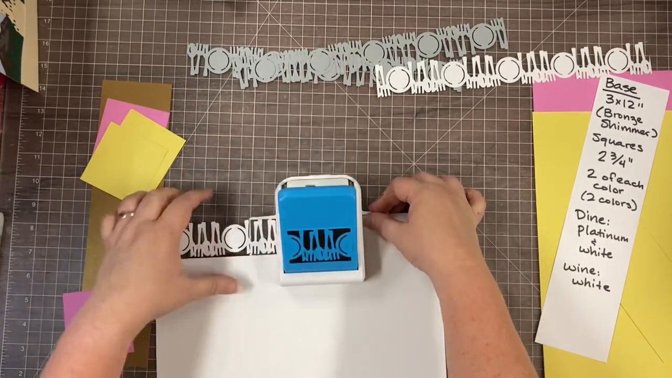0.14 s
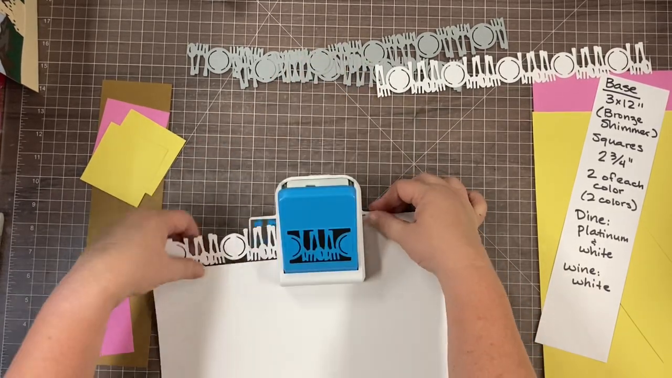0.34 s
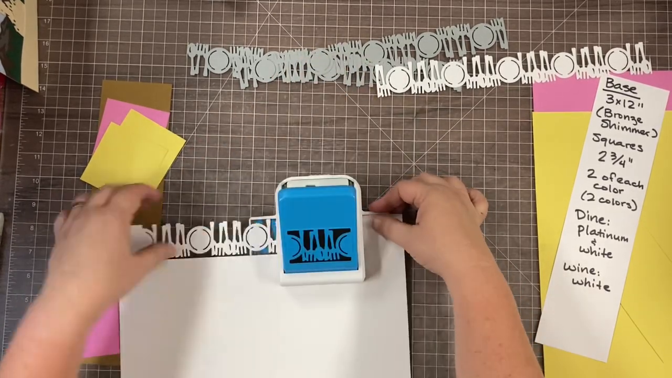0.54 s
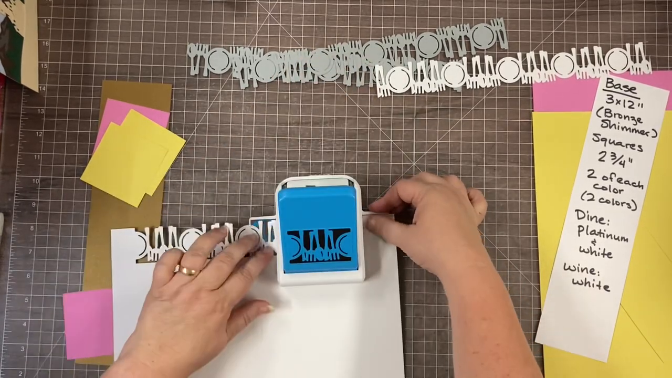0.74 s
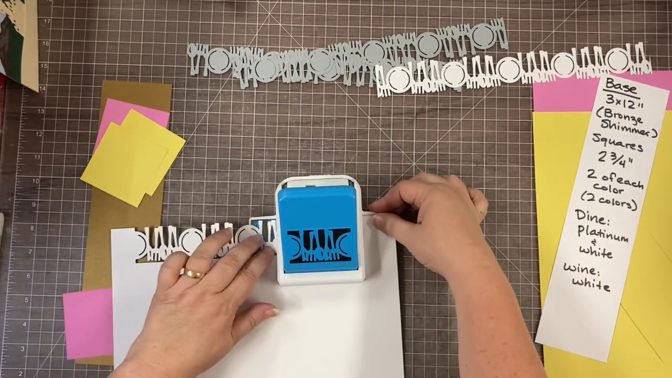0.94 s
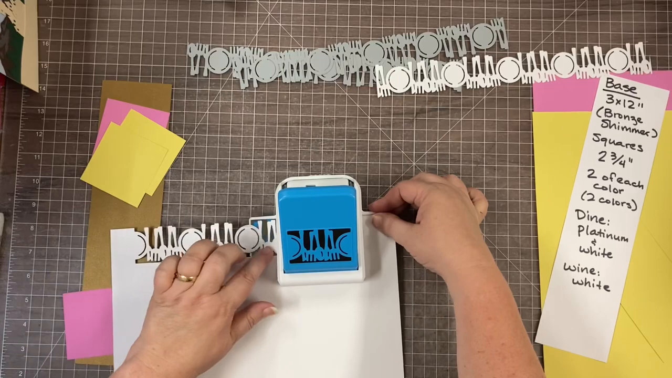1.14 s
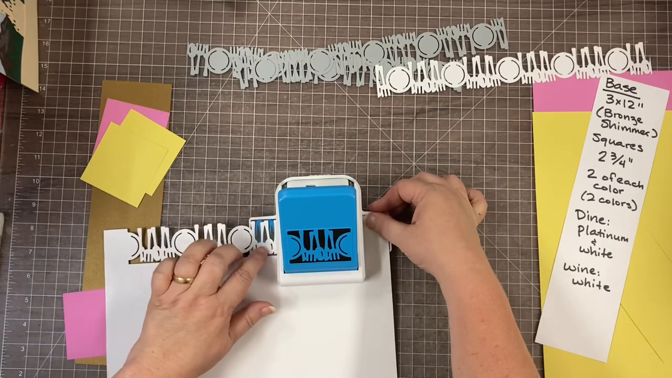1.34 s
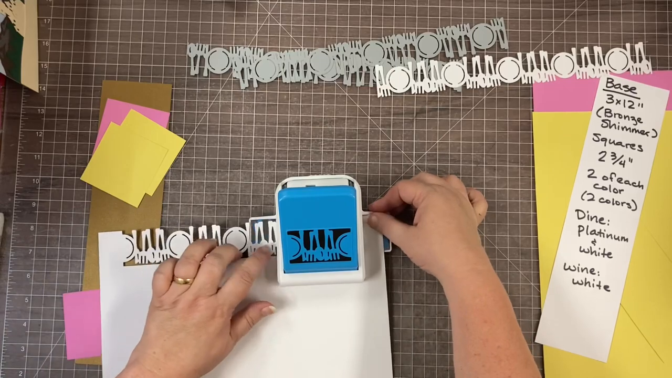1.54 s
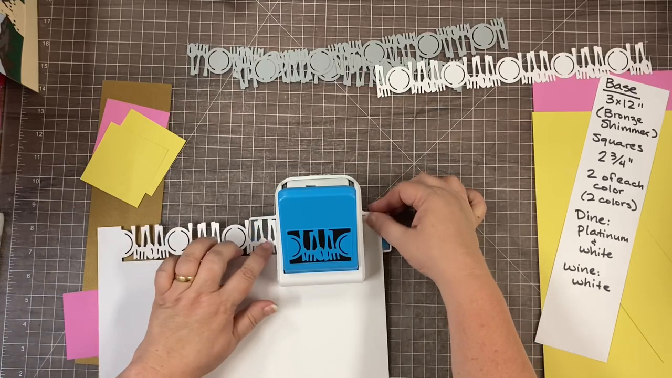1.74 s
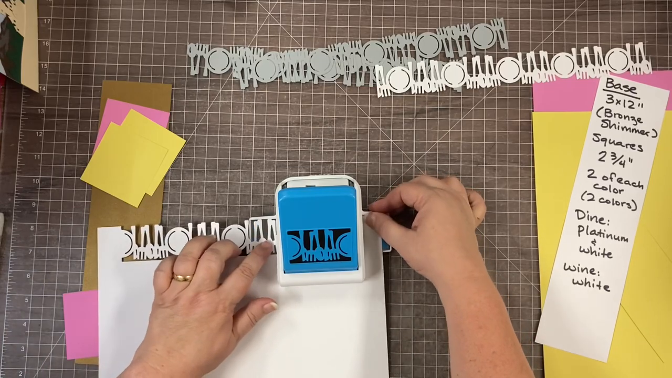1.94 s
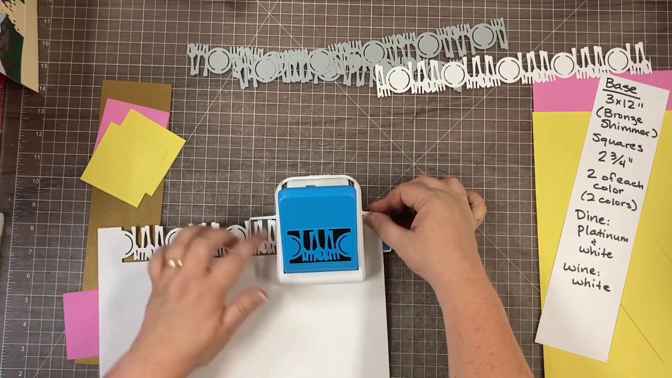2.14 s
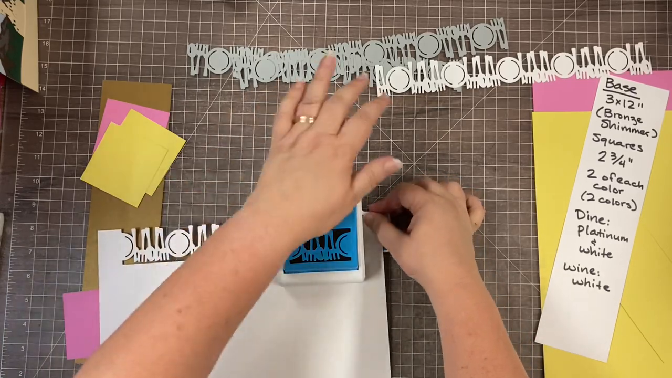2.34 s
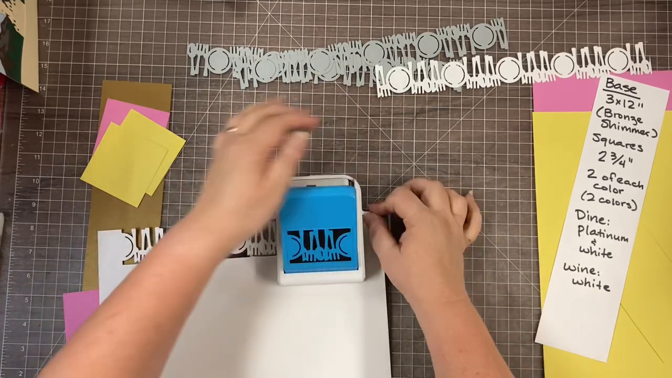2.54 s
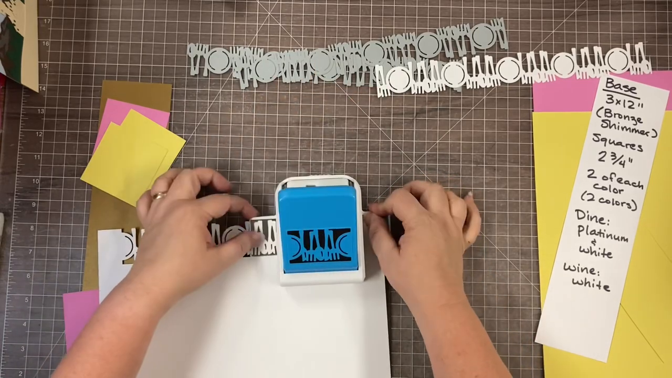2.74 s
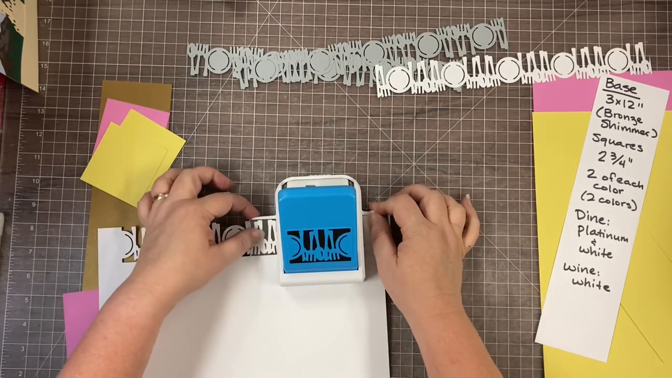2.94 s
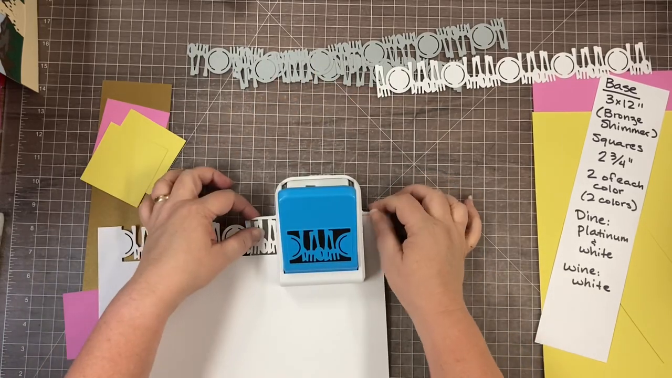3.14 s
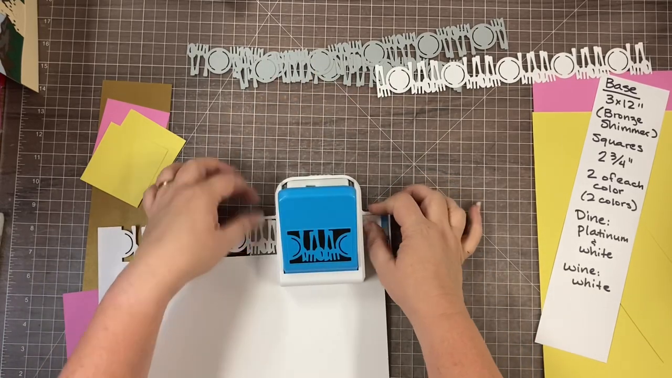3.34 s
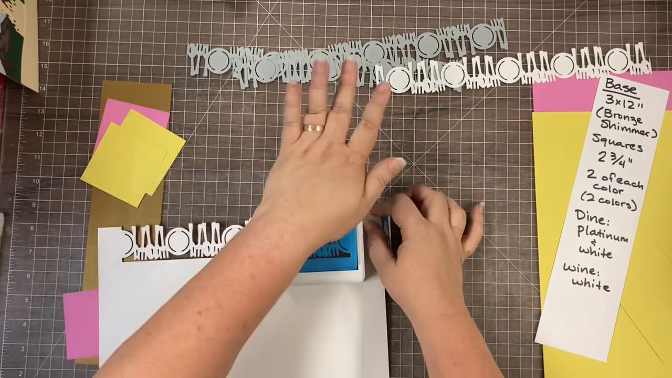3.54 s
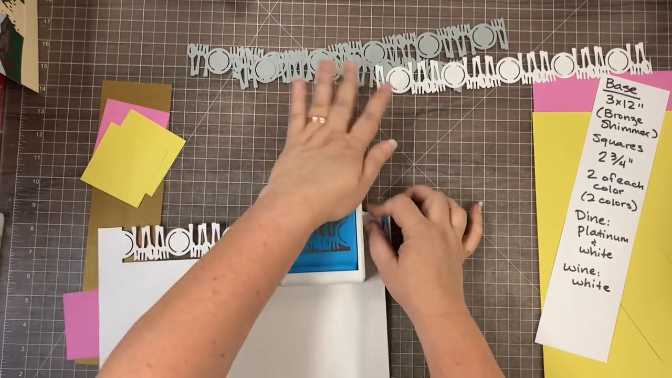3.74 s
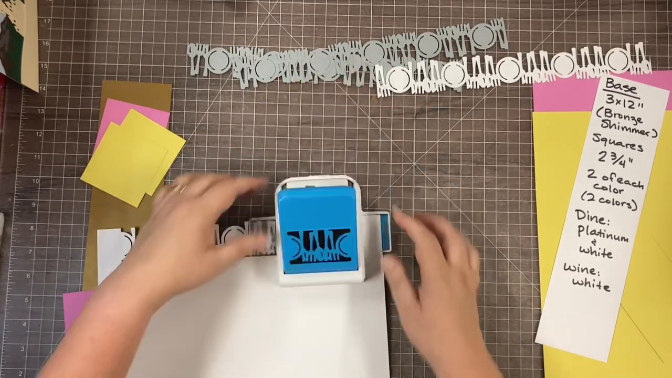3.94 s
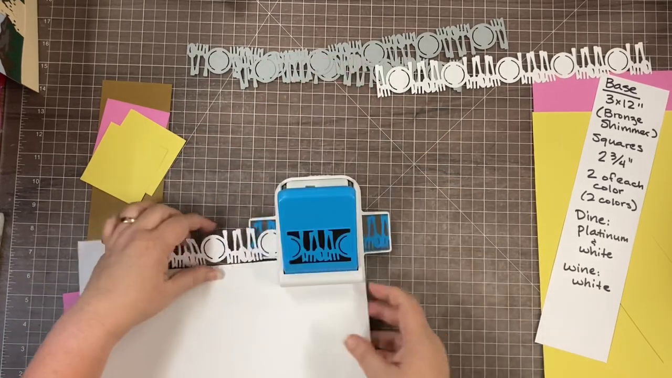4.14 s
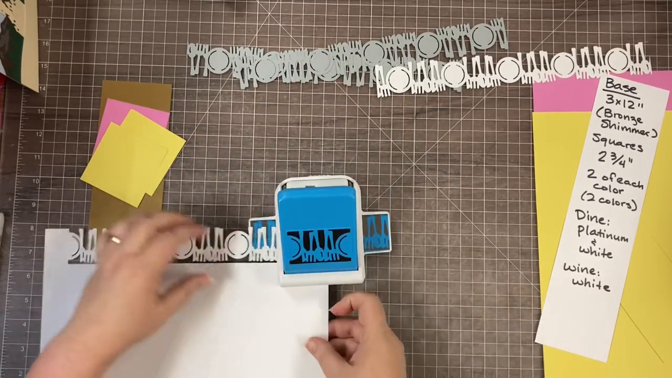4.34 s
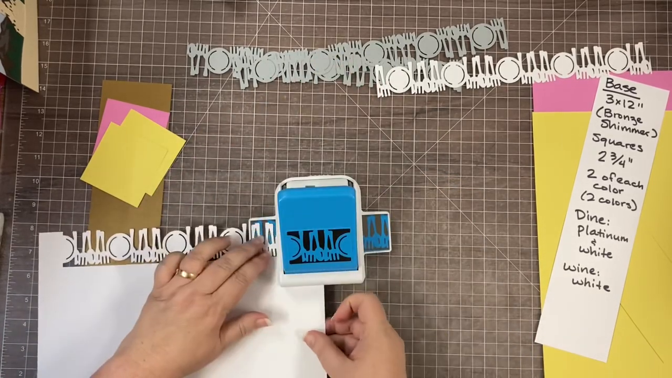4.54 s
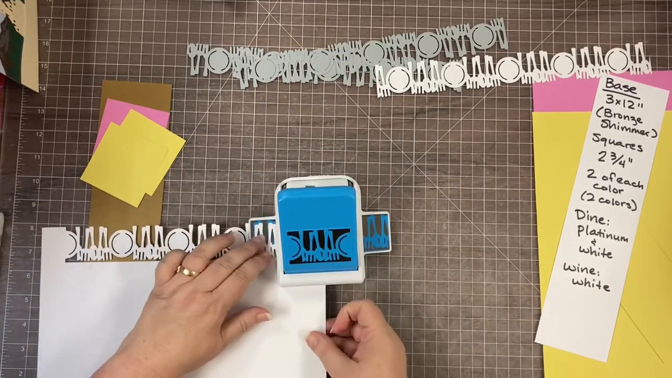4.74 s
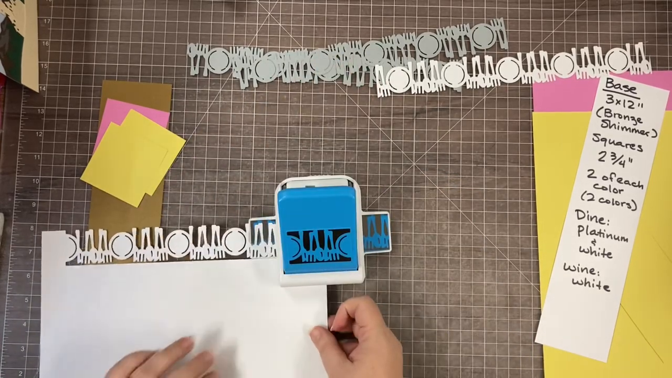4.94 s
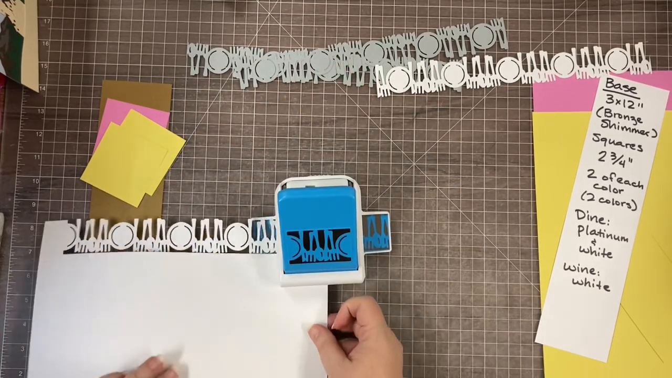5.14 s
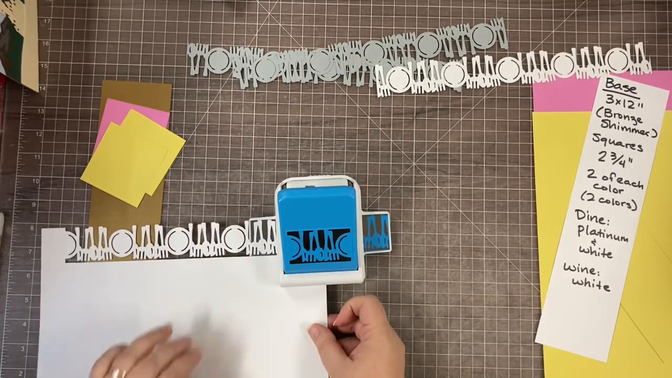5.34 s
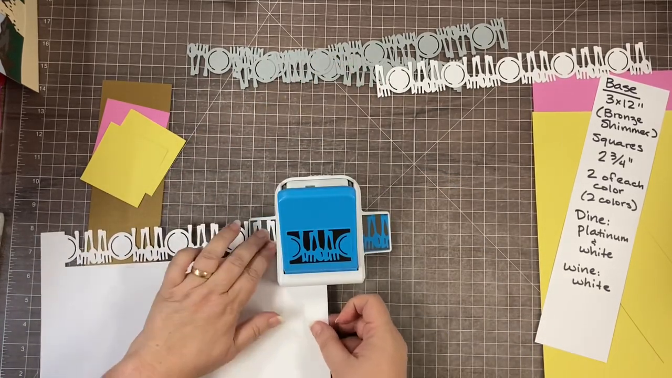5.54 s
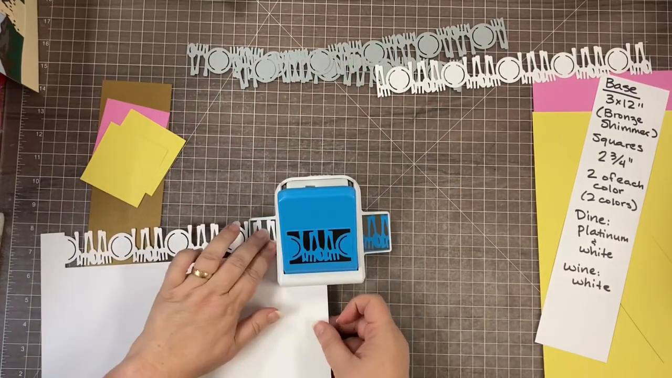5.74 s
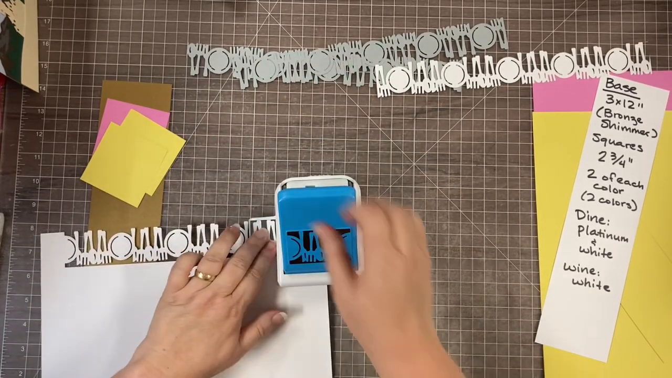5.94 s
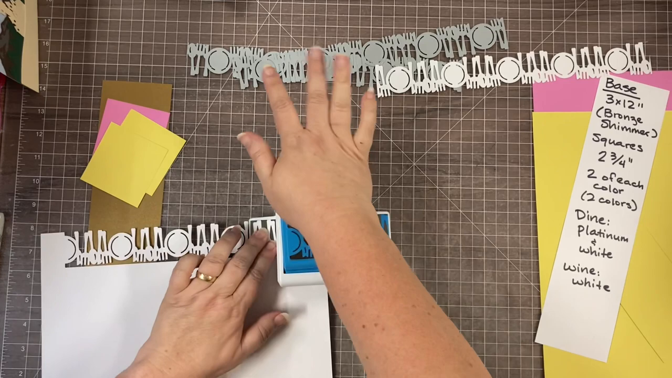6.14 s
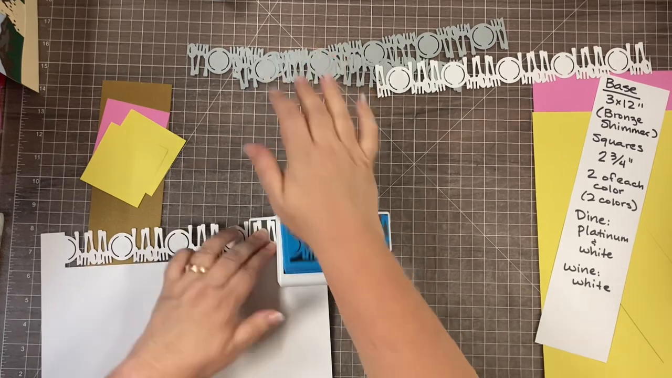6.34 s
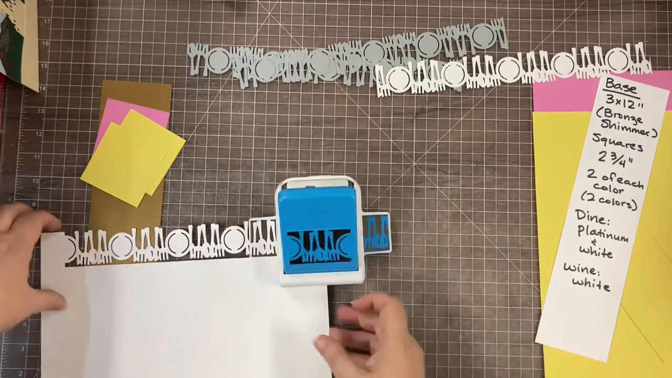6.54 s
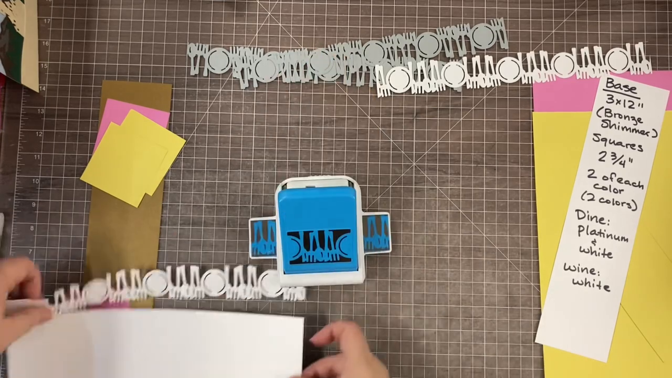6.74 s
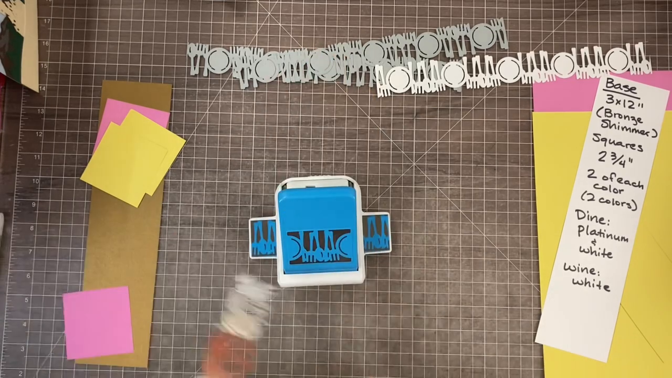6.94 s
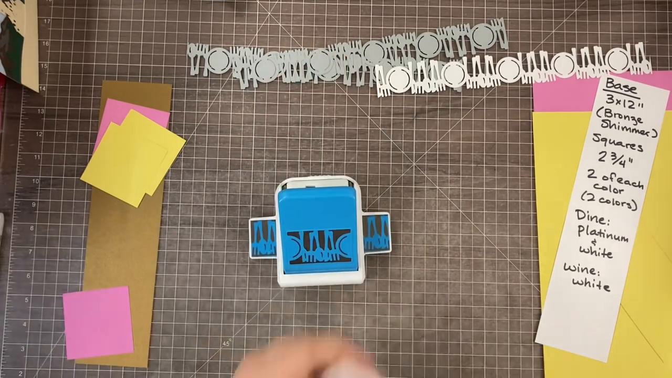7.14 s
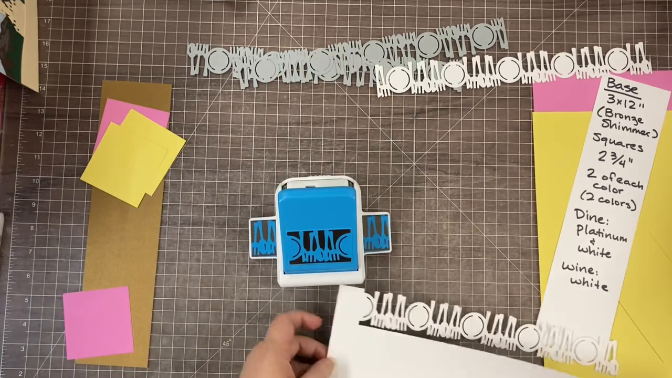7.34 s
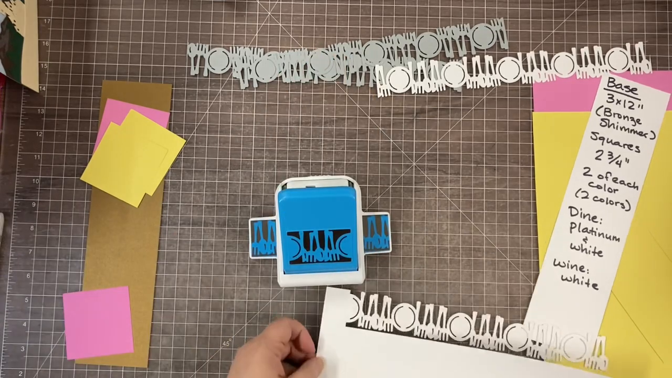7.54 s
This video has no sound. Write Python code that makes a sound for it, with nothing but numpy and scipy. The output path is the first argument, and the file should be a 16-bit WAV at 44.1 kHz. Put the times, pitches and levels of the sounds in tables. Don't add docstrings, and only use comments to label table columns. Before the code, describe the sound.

A lever craft punch crunches through card and thumps the desk twice, springing back each time, with paper sliding and ticking between over faint fan hum.

```python
import sys
import numpy as np
from scipy import signal
from scipy.fft import rfft, irfft, next_fast_len
from scipy.io import wavfile
from scipy.ndimage import uniform_filter1d

SR = 44100
rng = np.random.default_rng(int(sys.argv[2]) if len(sys.argv) > 2 else 0)


def transcribe(u):
    v = np.clip(np.atleast_2d(u).T, -1, 1)
    q = np.round(v * 32767).astype(np.int16)
    wavfile.write(sys.argv[1], SR, q)


def voltage_ratio(decibels):
    exponent = np.asarray(decibels, float) / 20
    return 10 ** exponent


N = 338688
T = np.arange(N) / SR
GRAIN = 4096
HZ = np.arange(GRAIN // 2 + 1) * SR / GRAIN
AGE = np.arange(GRAIN) / SR
LEAD_S = 0.03
SIDES = np.array([[1], [-1]])


def unit(x):
    return x / np.sqrt(np.mean(x ** 2))


def ring(hz, width_hz):
    return 1j * HZ * width_hz / (hz ** 2 - HZ ** 2 + 1j * HZ * width_hz)


def band(x, lo_hz, hi_hz):
    sos = signal.butter(2, [lo_hz, min(hi_hz, 0.45 * SR)], "band", fs=SR, output="sos")
    return signal.sosfilt(sos, x)


def walk(rate):
    k = int(SR / rate)
    steps = np.repeat(rng.standard_normal(N // k + 1), k)
    return 1.4 * uniform_filter1d(uniform_filter1d(steps, k), k)[:N]


def on_log(table, hz):
    table_hz, value = np.transpose(table)
    return np.interp(np.log(np.maximum(hz, 1)), np.log(table_hz), value)


def add(out, s, grain):
    i = int((s - LEAD_S) * SR)
    out[:, max(i, 0):i + GRAIN] += grain[:, max(-i, 0):N - i]


def strike(body, rise_s, snap_s, scrape_s, scrape_db, side_hz, pan_db):
    age = AGE - LEAD_S
    loading = np.exp(np.minimum(age, 0) / rise_s)
    release = np.exp(-age / snap_s) + voltage_ratio(scrape_db) * np.exp(-age / scrape_s)
    force = np.where(age < 0, loading, release)
    spread = HZ / np.hypot(HZ, side_hz)
    contact = rfft(rng.standard_normal((2, GRAIN)) * force)
    mid, side = irfft(contact * body * np.array([np.ones_like(spread), spread]))
    peak = np.sqrt(uniform_filter1d(mid ** 2, size=66).max())
    return (mid + SIDES * side) / peak * voltage_ratio(SIDES * pan_db / 2)


# (frequency [Hz], level [dB])
MOTOR_TONES = [(118.4, -61.5), (209.9, -71), (236.9, -75), (419.9, -78), (522.2, -84), (656.8, -83),
               (710.6, -82.5), (834.4, -78.5)]
# (frequency [Hz], level [dB per Hz])
AIR_SPECTRUM = [(18, -66), (30, -36.5), (59, -28), (90, -13.5), (121, -5), (165, -8.5), (221, -9.5),
                (364, -13), (822, -16), (962, -23.5), (1810, -38.5), (2120, -33), (2980, -41.5),
                (8080, -45.5), (16000, -55)]
# (frequency [Hz], correlation [0-1])
AIR_LIKENESS = [(60, 0.5), (130, 0.62), (290, 0.76), (640, 0.23), (1400, .1), (16000, .05)]
# (time [s], level [dB])
AIR_LEVEL = [(0, -65), (1.2, -65.5), (2, -67.5), (3.4, -68), (4.3, -67.5), (5, -66.5), (5.5, -69),
             (6, -67.5), (6.6, -65.5), (7, -63.5)]


def fan():
    air, swell, bumps = 0, walk(0.78), walk(45)
    for hz in 40 * 2 ** np.arange(0, 8.7, 0.33):
        like = np.clip(on_log(AIR_LIKENESS, hz), 0, 0.99)
        mid, side = band(rng.standard_normal((2, N)), hz / 1.12, hz * 1.12)
        band_db = on_log(AIR_SPECTRUM, hz) + 0.91 * swell + 2.0 * (hz < 400) * bumps + 1.3 * walk(7.6)
        air = air + voltage_ratio(band_db) * (np.sqrt(1 + like) * mid + np.sqrt(1 - like) * side * SIDES)
    level_db = np.interp(T, *np.transpose(AIR_LEVEL))
    air = air / band(air.mean(0), 120, 900).std() * voltage_ratio(level_db + 1.0)
    tones = 0
    for hz, db in MOTOR_TONES:
        level = voltage_ratio(db + 0.5 + 1.0 * walk(16))
        turns = np.cumsum(hz + 1.2 * walk(2)) / SR
        tones = tones + level * np.sin(2 * np.pi * turns + 6 * rng.random())
    return air + tones * voltage_ratio(0.44 * (level_db - level_db.mean()) + 0.4 * SIDES)


# (frequency [Hz], t60 [s], level re direct [dB])
ROOM_TAIL = [(245, 0.17, -29), (1230, 0.047, -19.5), (4000, 0.3, -25.5), (10000, 0.084, -13.5)]


def room(x):
    age = T[:SR // 2]
    tail = 0
    for hz, t60, db in ROOM_TAIL:
        noise = unit(band(rng.standard_normal((2, len(age))), hz / 2, hz * 3.6))
        tail = tail + voltage_ratio(db - 60 * age / t60) / np.sqrt(t60 * SR / 14) * noise
    tail = tail * np.minimum(age / 0.0022, 1)
    return signal.fftconvolve(x.mean(0)[None], tail)[:, :N]


# (start [s], held [s], rustle level [dB], resonance [Hz])
PULLS = [(0.14, .04, -73, 3400), (0.195, 0.0865, -64.5, 4240), (0.335, 0.1, -68, 4220),
         (0.43, 0.11, -66.5, 4100), (0.57, 0.044, -78, 3760), (.635, .06, -76.5, 3970),
         (.72, 0.065, -79.5, 4000), (0.86, 0.054, -85.5, 4000), (1.189, .07, -76, 4000),
         (1.745, .015, -80, 4150), (3.99, .13, -63, 4000), (4.13, 0.12, -62, 3200),
         (4.26, 0.12, -73.5, 3400), (4.55, 0.06, -80, 3400), (4.87, 0.067, -79, 3400),
         (4.939, 0.047, -65, 3690), (5.0, 0.071, -68, 2640), (5.11, 0.044, -59, 2600),
         (5.155, 0.014, -51.5, 1887), (5.19, 0.077, -65.5, 2380), (5.249, 0.028, -63.5, 3250),
         (6.57, 0.177, -61.5, 4790), (6.78, 0.11, -62.5, 4000), (6.858, 0.1, -61, 2660),
         (6.96, 0.15, -72, 2800), (7.28, 0.096, -70, 3200), (7.35, 0.066, -68.5, 3050),
         (7.45, .09, -68, 3600), (7.615, 0.044, -74.5, 3500), (7.67, 0.0194, -63, 4500)]


def pulls():
    rise_db_s, fall_db_s = 700, 560
    t = T[::64]
    s, held, db, hz = np.transpose(PULLS)[:, :, None]
    rise_db = rise_db_s * np.maximum(s - t, 0)
    fall_db = fall_db_s * np.maximum(t - s - held, 0)
    power = voltage_ratio(db - rise_db - fall_db) ** 2 + 1e-15
    total = power.sum(0)
    return np.interp(T, t, 10 * np.log10(total)), np.interp(T, t, (power * hz).sum(0) / total)


def rustle():
    out = np.zeros((2, N))
    db, hz = pulls()
    bright_db = -3 + 7 * np.log2(hz / 4000)
    slip_db = 2.2 * rng.exponential(size=N) + 1.5 * walk(40) + 2.0 * walk(250)
    slips = rng.standard_normal((2, N)) * voltage_ratio(slip_db)
    slips /= slips.std()
    for k, centre in enumerate(1300 * 2 ** np.arange(0, 3.7, 0.3)):
        if centre > 6000:
            rel_db = bright_db - 6
        else:
            octaves_off = abs(np.log2(centre / np.maximum(hz, 500)))
            rel_db = -13 * np.minimum(octaves_off, 0.7) - 3.0 - 5 * (centre < 1500)
        flicker_db = 3.2 * walk(22) + 1.5 * walk(90)
        level = voltage_ratio(db + rel_db + flicker_db) * np.sqrt(SR / centre)
        mid, side = band(slips, centre / 1.17, centre * 1.1) * level
        out += (-1) ** k * (mid + min(centre / 16000, 1) * side * SIDES)
    return out


# (time [s], peak level [dB], pitch [Hz])
TICKS = [(0.1346, -49, 3050), (0.2126, -39.5, 3930), (0.45, -32.5, 3660), (0.758, -55.5, 4000),
         (1.4281, -49.5, 4430), (1.6413, -57.5, 4000), (1.869, -59, 1973), (2.463, -54, 4116),
         (2.8554, -49, 3900), (2.904, -52.5, 3520), (2.929, -54.5, 3860), (3.134, -60.5, 3560),
         (3.988, -53, 4600), (4.0315, -47.5, 4137), (4.1172, -47.5, 3930), (4.2718, -52, 6500),
         (4.598, -46.5, 4000), (4.8079, -54, 3090), (4.8357, -49.5, 3083), (4.8668, -53, 4080),
         (4.9122, -51.5, 2994), (5.055, -46, 2270), (5.121, -35.5, 2273), (5.252, -40.5, 2860),
         (5.9399, -56.5, 8991), (6.748, -38.5, 7160), (6.828, -42, 4100), (6.8593, -36, 2130),
         (7.267, -39, 5800), (7.3456, -51, 3180)]
# (time [s], peak level [dB], pitch [Hz])
RUBS = [(0.1787, -50, 7120), (0.269, -43, 4630), (0.361, -44, 4300), (0.5283, -37.5, 4750),
        (1.09, -67, 4000), (1.55, -61.5, 4200), (2.0813, -67.5, 1760), (2.4113, -56, 2040),
        (2.601, -66, 2430), (2.7149, -67.5, 2190), (2.765, -68.5, 4600), (3.0744, -52.5, 3560),
        (3.2422, -64.5, 2265), (3.3346, -63.5, 2646), (4.209, -44, 3050), (4.47, -63, 3500),
        (5.0277, -49.5, 2140), (5.192, -51, 1915), (5.7832, -64.5, 4150), (6.0619, -57, 1990),
        (6.548, -50, 4960), (6.584, -41, 4970), (6.68, -49, 3540), (6.897, -41.5, 2570),
        (7.518, -42.5, 3200), (7.6122, -56, 3220)]


def edges():
    out = np.zeros((2, N))
    for events, rise_ms, treble_db in (TICKS, 0.37, -14), (RUBS, 4.1, -7):
        for s, db, hz in events:
            bright_db = treble_db + 16 * np.log2(hz / 4000)
            body = ring(hz, 0.18 * hz) + voltage_ratio(-7.0 - 2.9 * rise_ms) * ring(4400, 2200)
            body = (body + voltage_ratio(bright_db) * ring(7900, 13000)) * ring(3300, 20000)
            grain = strike(body, rise_s=rise_ms * 0.00096, snap_s=0.00085 + rise_ms * 0.0019, scrape_s=0.011,
                           scrape_db=-4.0, side_hz=14000, pan_db=-2.6)
            add(out, s + 0.002, voltage_ratio(db - 8.5) * grain)
    return out


# (time [s], tone [Hz], level [dB], rubbed for [s], t60 [s])
SPRING = [(0.018, 1587, -66.5, 0, 1), (3.881, 1598, -71.5, 0.0027, 0.73), (4.189, 1600, -64, 0.0042, .1),
          (6.37, 1615, -68.5, 0.006, 0.82), (6.62, 1660, -54.5, 0.06, 0.15),
          (7.343, 1670, -47, 0.0015, 0.086), (7.481, 1645, -70, 0, 0.126),
          (7.521, 1664, -51.5, 0.00018, 0.047)]


def spring():
    out = np.zeros((2, N))
    waver_db, bend = 2 * walk(110), np.cumsum(12 * walk(25)) / SR
    for s, hz, db, rubbed_s, t60 in SPRING:
        now = slice(int(s * SR), int((s + rubbed_s + t60) * SR))
        age = abs(T[now] - s)
        fade_db = 60 * np.maximum(age - rubbed_s, 0) / t60
        tone = np.sin(2 * np.pi * (hz * age + bend[now])) * np.minimum(age / 0.0041, 1)
        out[:, now] += voltage_ratio(db + waver_db[now] - fade_db) * tone
    return out


# (time [s], level [dB], upper desk modes [dB])
THUMPS = [(.002, -23, -4), (.011, -20, -16.5), (0.177, -45, -1), (2.414, -44.5, -8), (2.436, -45, -9),
          (2.467, -44.5, 0.5), (3.524, -41, -7), (3.54, -31, 1.5), (3.593, -31, -1.5), (3.604, -31, -9),
          (3.649, -36.5, -6.5), (3.674, -29.5, -5), (3.69, -23.5, 0.5), (3.698, -21, 9.5),
          (3.705, -14.5, -12.5), (3.733, -39, 1.5), (3.858, -28.5, 2.5), (3.867, -31.5, 7),
          (3.878, -22.5, -11.5), (6.124, -33.5, -9), (6.161, -37.5, -2), (6.181, -30.5, -9),
          (6.206, -26, 2), (6.222, -24.5, -5), (6.2379, -10, -9.5), (6.261, -34.5, 0), (6.357, -31, 3.5),
          (6.368, -24, -9), (6.396, -32.5, -17), (6.55, -41, 6)]
# (frequency [Hz], width [Hz], level [dB])
DESK_MODES = [(155.5, 62, 4), (114.9, 52, -7.5), (234.7, 28, 7.5), (329, 82, 4), (465.4, 60, -9)]
# (time [s], level [dB])
JOLTS = [
    (3.704, -31),
]


def desk():
    out = np.zeros((2, N))
    for s, db, upper_db in THUMPS:
        body = 0
        for k, (hz, width_hz, mode_db) in enumerate(DESK_MODES):
            body = body + voltage_ratio(mode_db + upper_db * (k > 1)) * ring(hz, width_hz) ** 2
        wave = irfft(body)
        add(out, s + LEAD_S, voltage_ratio(db - 0.5 + 0.5 * SIDES) * wave / abs(wave).max())
    for s, db in JOLTS:
        shake = np.sin(2 * np.pi * 32 * AGE) * np.exp(-AGE / 0.016)
        add(out, s + LEAD_S, voltage_ratio(db) * shake[None])
    return out


# (frequency [Hz], width [Hz], level [dB])
HOUSING_MODES = [(535, 260, -3.5), (786, 430, -3), (1015, 120, -1.5), (1337, 130, -5), (1640, 100, -2),
                 (1980, 160, -1.5), (2300, 520, -4), (2620, 260, -3.5), (3200, 220, -8), (4170, 600, -6.5),
                 (4666, 330, -11), (5012, 270, -4.5), (6700, 1300, -6), (7640, 2200, -7),
                 (11100, 980, -6.5), (15800, 2800, -10.5)]
# (time [s], peak level [dB], bright 5-15 kHz re peak [dB], scrape [ms])
KNOCKS = [(0.182, -50.5, -17.5, 9.4), (0.205, -53, -8, 12), (2.416, -54, -29, 24), (2.44, -52, -21.5, 6.2),
          (2.467, -54.5, -25, 10.7), (2.9, -58.5, -16, 13), (6.552, -45, -11.5, 14),
          (7.19, -52.5, -17, 4.5)]
SLACK = [(3.505, -56.5, -14, 6.2), (3.5217, -46.5, -15, 12), (3.5411, -36.5, -18.5, 9.1),
         (3.5903, -32.5, -10.5, 12), (3.6001, -39, -4, 9.6), (3.6092, -43, -8, 6.9),
         (6.0714, -54.5, -25.5, 16), (6.1255, -42.5, -10, 17), (6.1375, -42, -8.5, 5.7),
         (6.159, -41, -8, 8), (6.1787, -36.5, -8.5, 7.4), (6.184, -34, -12, 5.1), (6.192, -39, -6.5, 19.7)]
CUTS = [(3.6445, -43, -15, 3.8), (3.6494, -41.5, -10.5, 12), (3.6605, -37.5, -14.5, 7.4),
        (3.674, -25.5, -20.5, 2.5), (3.6803, -34.5, -10, 12), (3.687, -22, -17, 1.2),
        (3.6895, -20.5, -15, 5.6), (3.694, -13.5, -16, 2.3), (3.6987, -9.5, -17.5, 1.4),
        (3.7033, -13, -6, 4.8), (3.7452, -44, -3.5, 2.3), (6.204, -27.5, -20, 4.9), (6.2107, -24, -9, 11.5),
        (6.22, -22.5, -15, 3.15), (6.229, -14, -19.5, 0.92), (6.2368, -11.5, -6, 4.5),
        (6.2696, -46.5, -9.5, 3.45)]
RETURNS = [(0.0041, -24, -11.5, 3.2), (0.0127, -34, -9.5, 6.9), (3.832, -41.5, -14.5, 6.3),
           (3.841, -38, -11, 34), (3.8568, -25.5, -10, 8.7), (3.863, -24.5, -6.5, 4.3),
           (3.8757, -26.5, -9, 2.5), (3.9343, -59, -4, 8.5), (3.9405, -52.5, 0, 8.5),
           (6.3345, -47.5, -10.5, 11.4), (6.347, -40, -5, 13), (6.3582, -29.5, -6, 7.54),
           (6.3655, -31.5, -10, 8.6)]


def punch():
    out = np.zeros((2, N))
    mode_hz = np.array(HOUSING_MODES)[:, 0]
    # events, hollow 400-1200 Hz re peak [dB], build-up [ms], top of the contact [Hz]
    stages = [(KNOCKS, 11, 0.35, 1900), (SLACK, -1.1, 7.3, 14000),
              (CUTS, -6.5, 1.7, 48000), (RETURNS, -7.5, 3, 30000)]
    for events, hollow_db, rise_ms, top_hz in stages:
        for s, db, bright_db, scrape_ms in events:
            upper_db = np.where(mode_hz > 5000, bright_db + 2.5, 0)
            tilt_db = np.where(mode_hz < 1200, hollow_db + 9.0, upper_db)
            tilt_db = tilt_db + 2 * (mode_hz < 5000) * rng.standard_normal(len(mode_hz))
            body = 0
            for k, (hz, width_hz, mode_db) in enumerate(HOUSING_MODES):
                body = body + (-1) ** k * voltage_ratio(mode_db + tilt_db[k]) * ring(hz, width_hz)
            body = body / (1 + 1j * HZ / top_hz)
            grain = strike(body, rise_s=rise_ms * 0.0007, snap_s=0.00098, scrape_s=scrape_ms * 0.0013,
                           scrape_db=-3.5, side_hz=13000, pan_db=-1.3)
            add(out, s, voltage_ratio(db) * grain)
    return out


def scene():
    near = rustle() + edges() + spring() + desk() + punch()
    return near + room(near) + fan()


def low_pass(x):
    return signal.sosfilt(signal.butter(12, 16820, fs=SR, output="sos"), x)


# (frequency [Hz], gain [dB])
MIC_RESPONSE = [(20, -5), (60, -0.5), (9000, 0.5), (11500, -6.5), (13000, -13.5), (14000, -2),
                (15600, -0.5), (16100, -11.5), (16600, -45)]


def record(dry):
    port_lag_s = 2.8e-5
    size = next_fast_len(N)
    hz = np.arange(size // 2 + 1) * SR / size
    lag = np.exp(-2j * np.pi * hz * port_lag_s * np.array([[1], [0]]))
    ports = voltage_ratio(on_log(MIC_RESPONSE, hz)) * lag
    mix = irfft(rfft(dry, size) * ports, size)[:, :N]
    return low_pass(mix)


dry = scene()
out = record(dry)
transcribe(out)
```